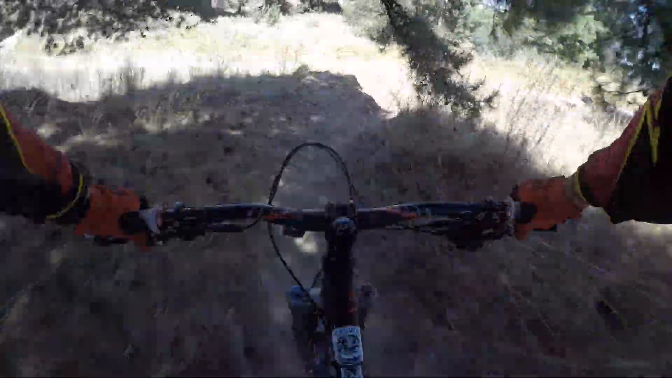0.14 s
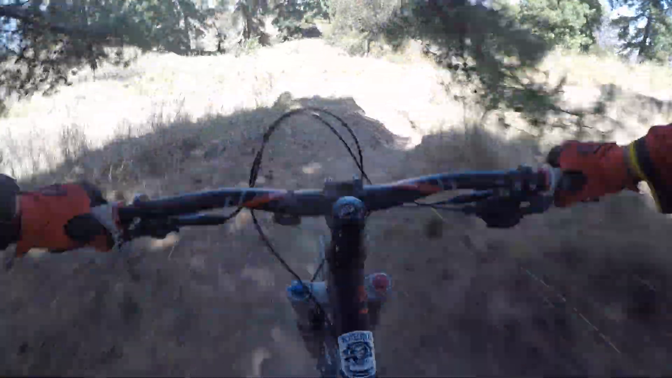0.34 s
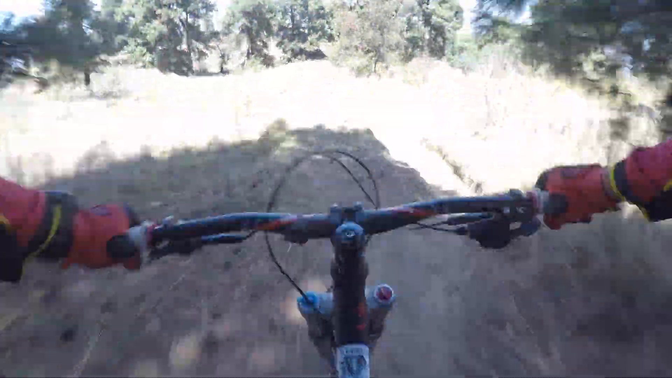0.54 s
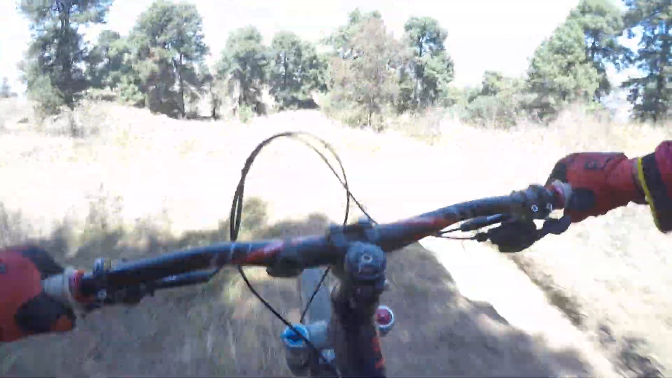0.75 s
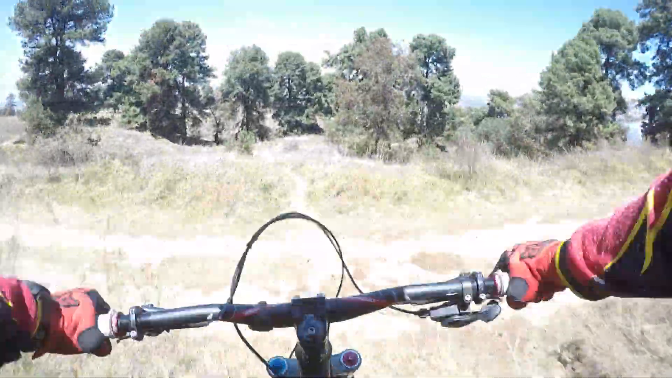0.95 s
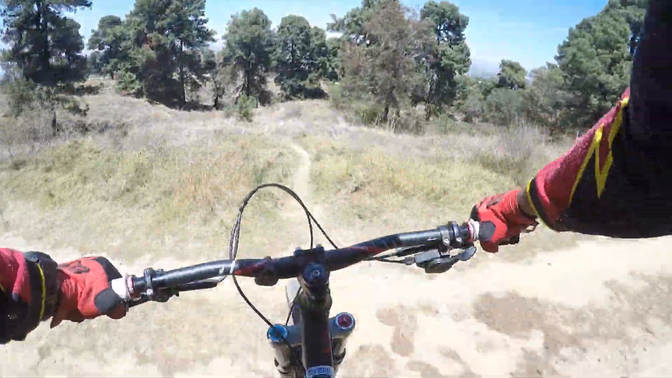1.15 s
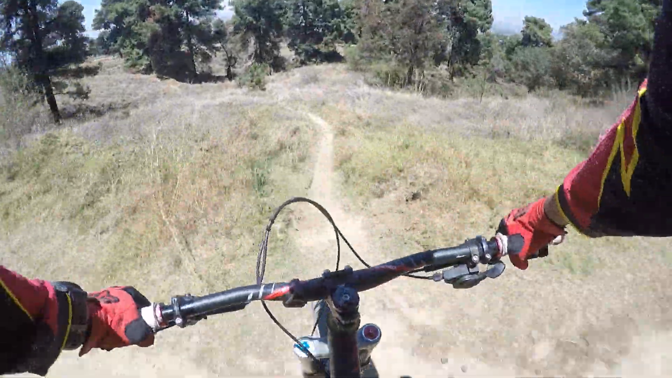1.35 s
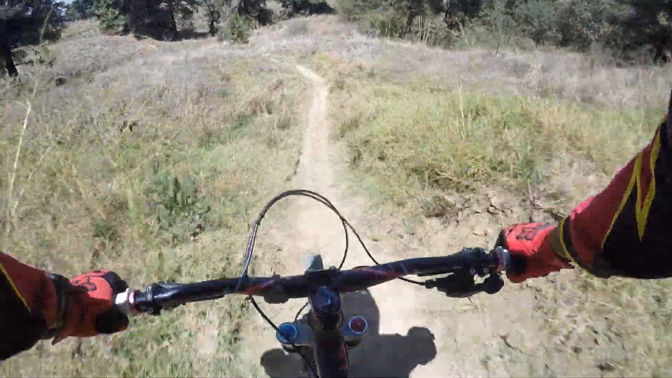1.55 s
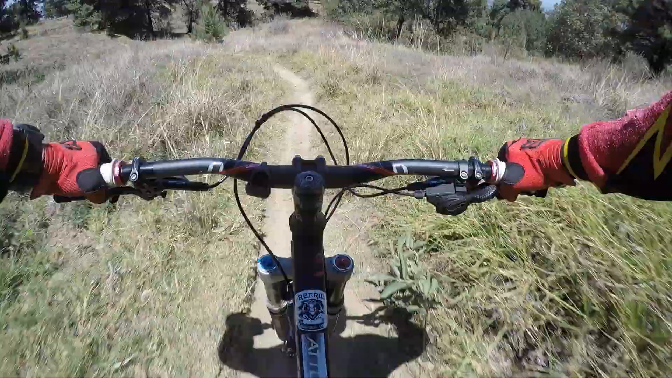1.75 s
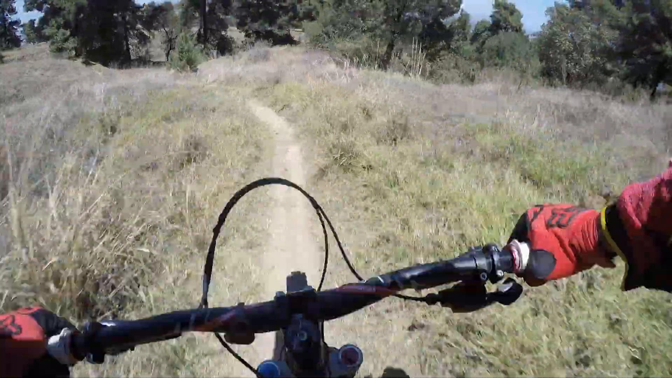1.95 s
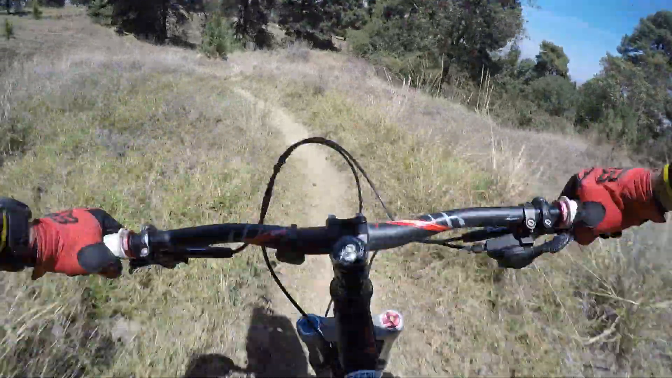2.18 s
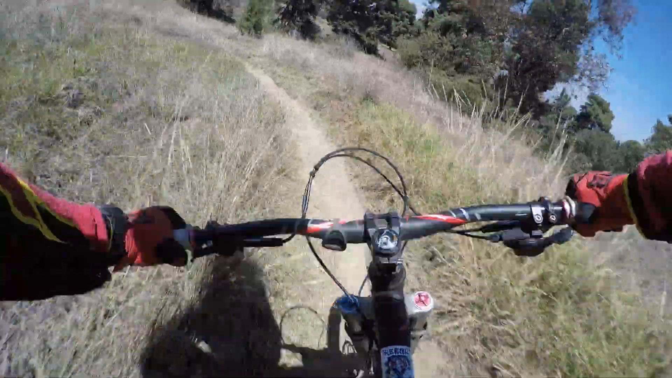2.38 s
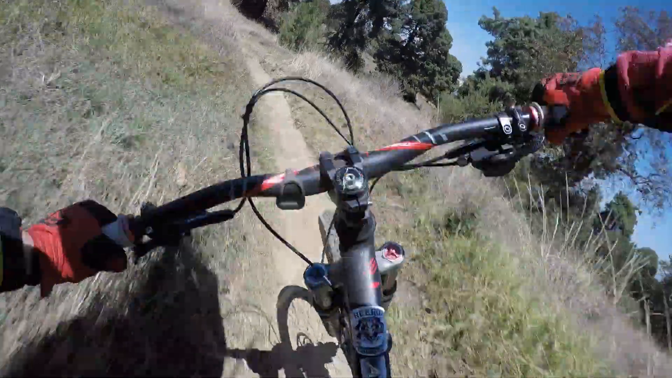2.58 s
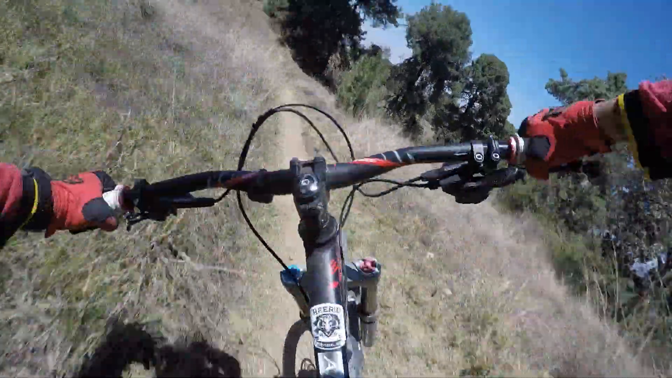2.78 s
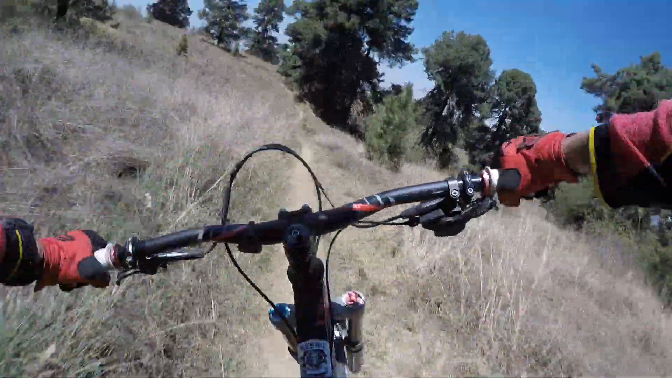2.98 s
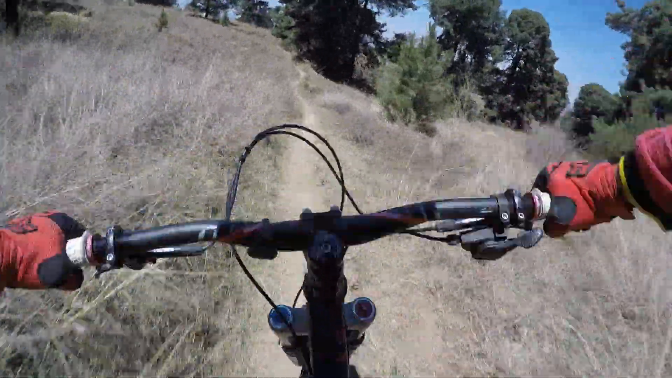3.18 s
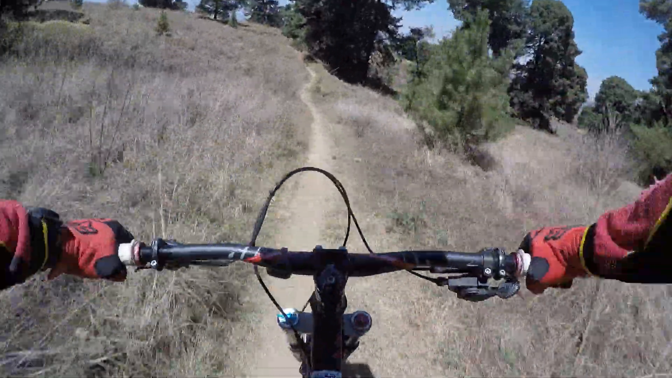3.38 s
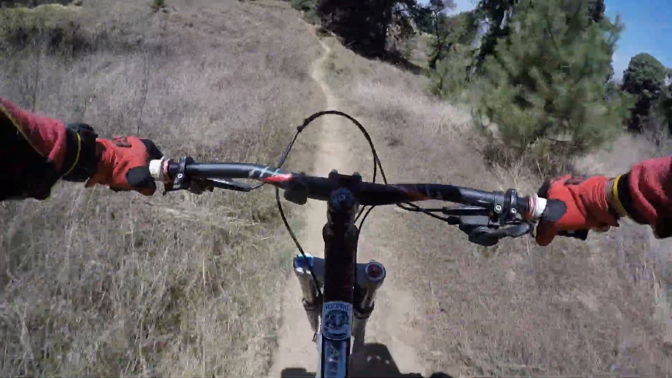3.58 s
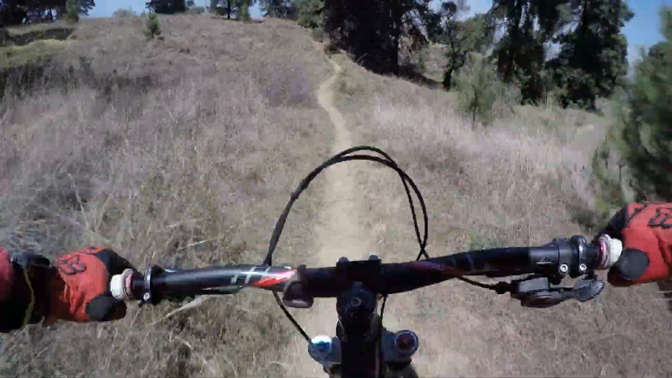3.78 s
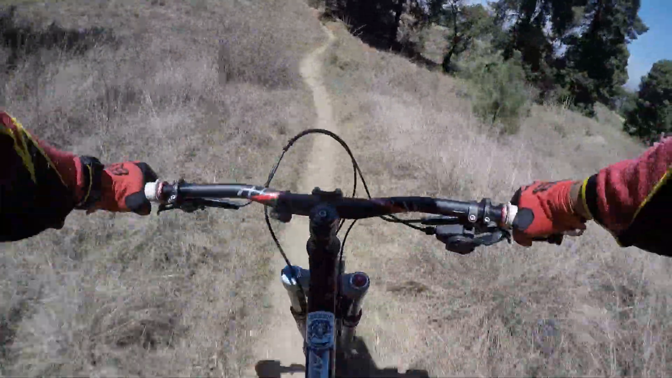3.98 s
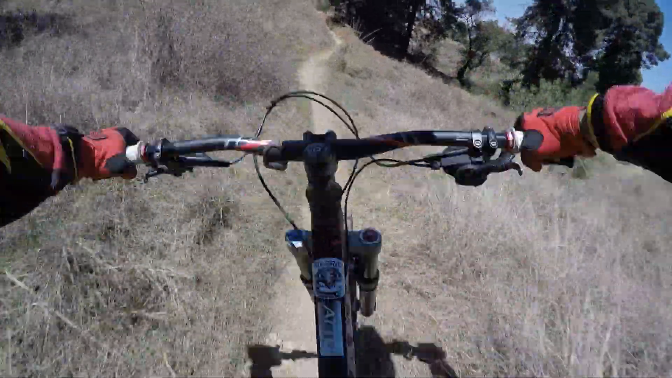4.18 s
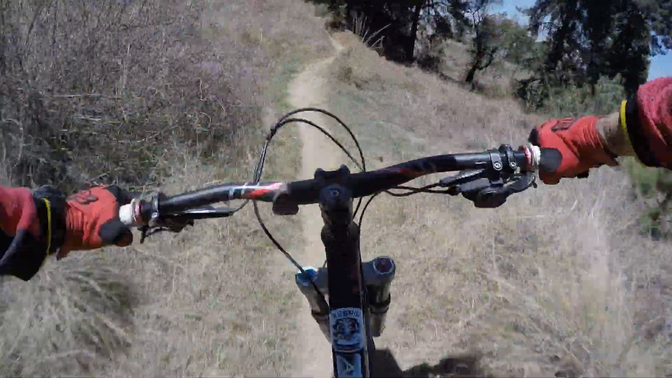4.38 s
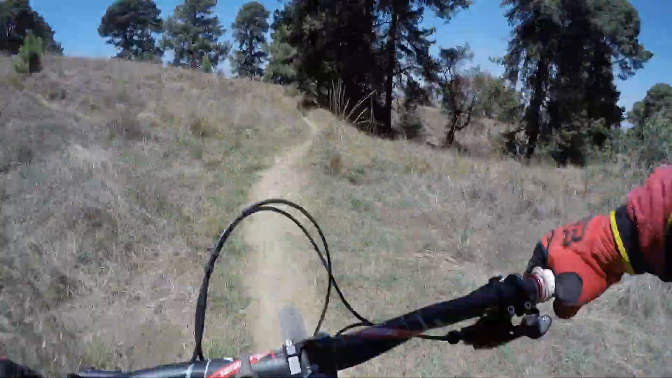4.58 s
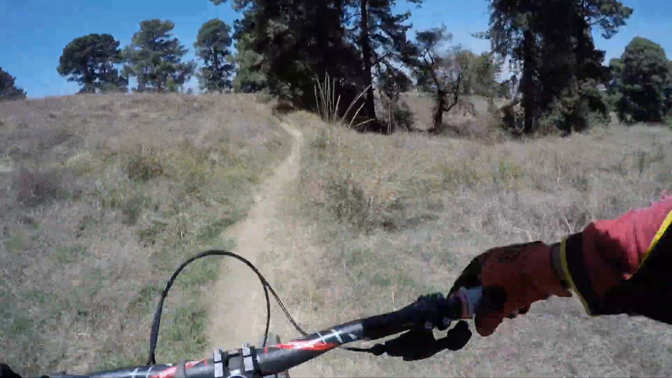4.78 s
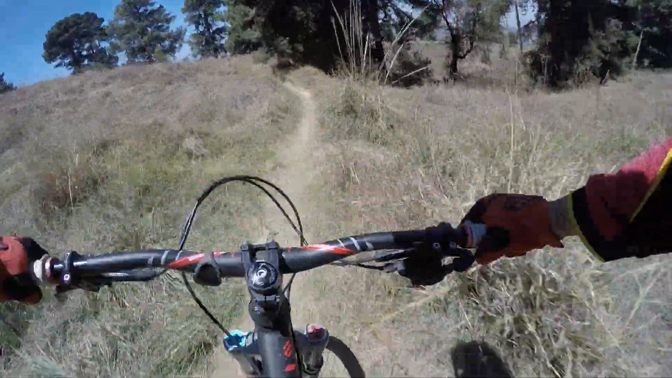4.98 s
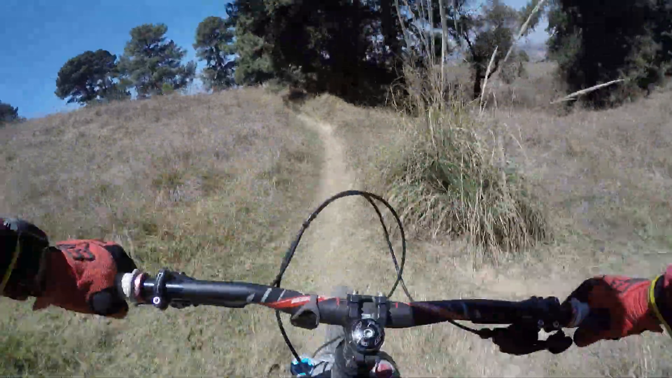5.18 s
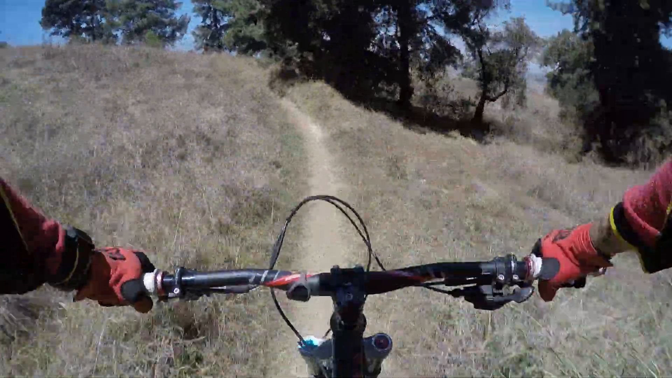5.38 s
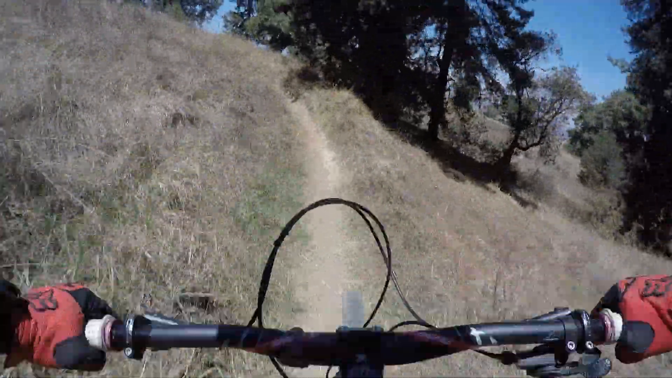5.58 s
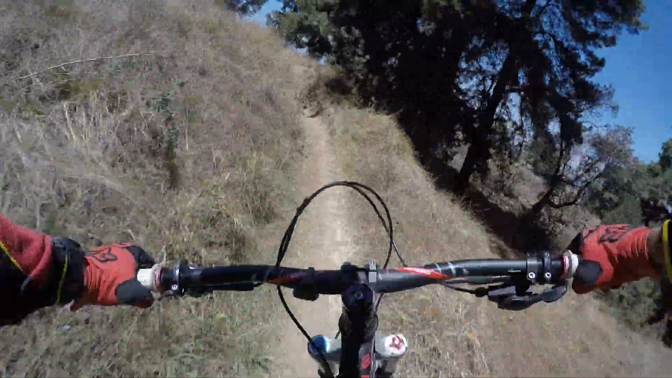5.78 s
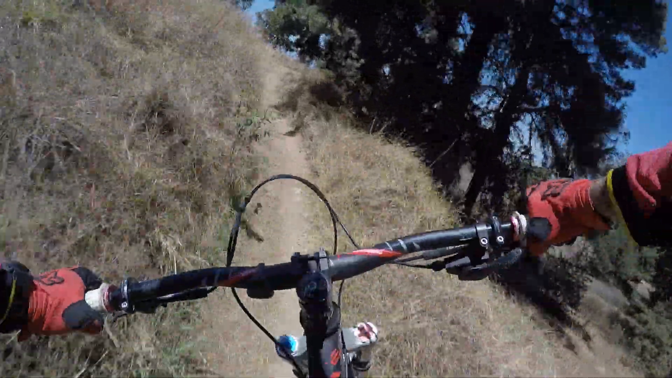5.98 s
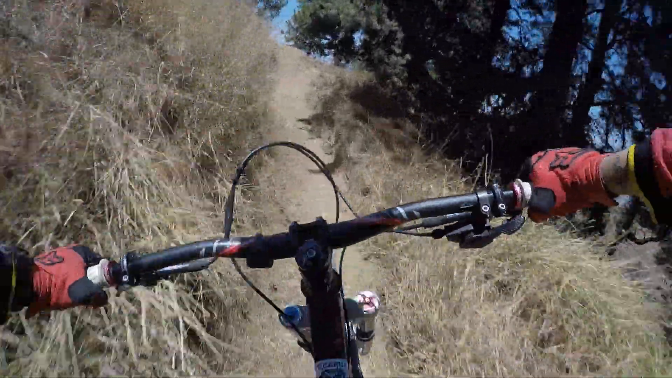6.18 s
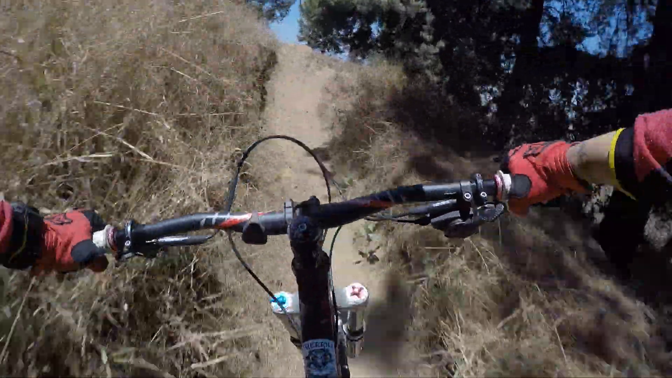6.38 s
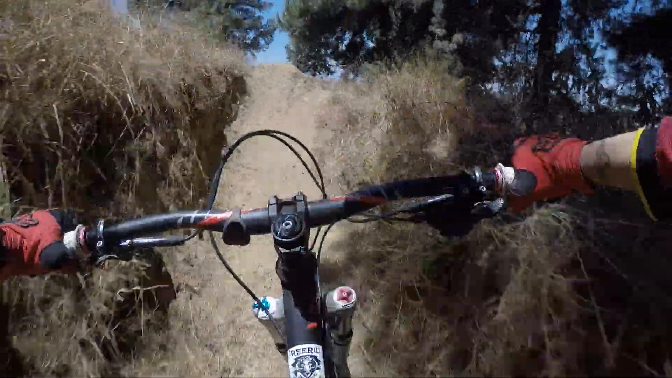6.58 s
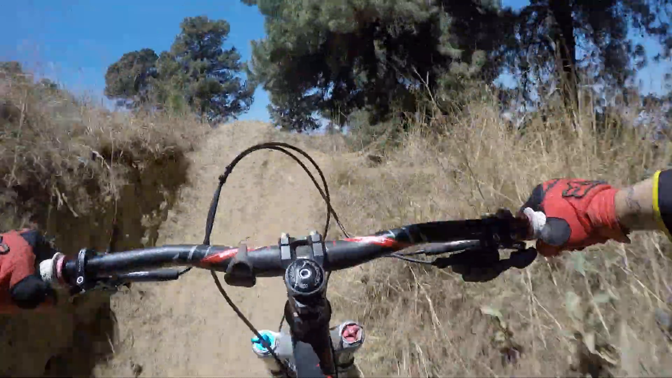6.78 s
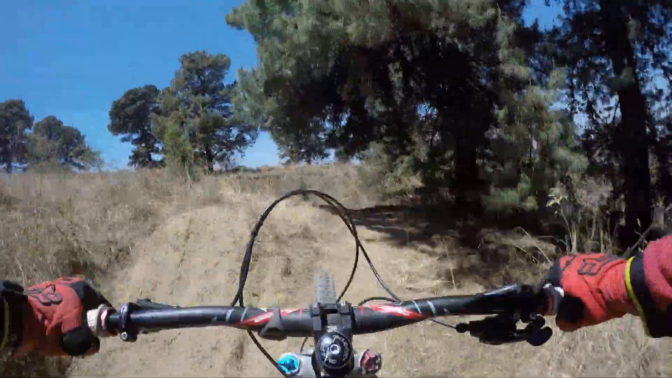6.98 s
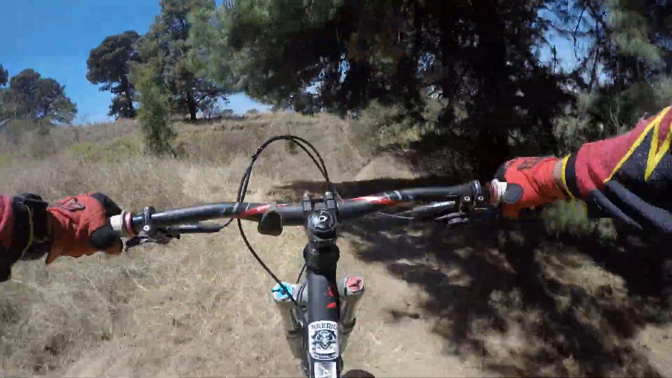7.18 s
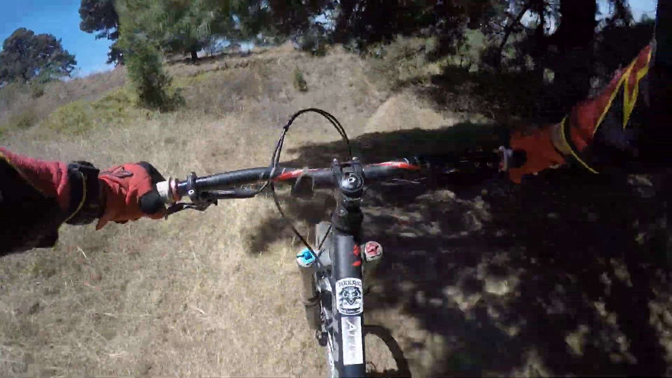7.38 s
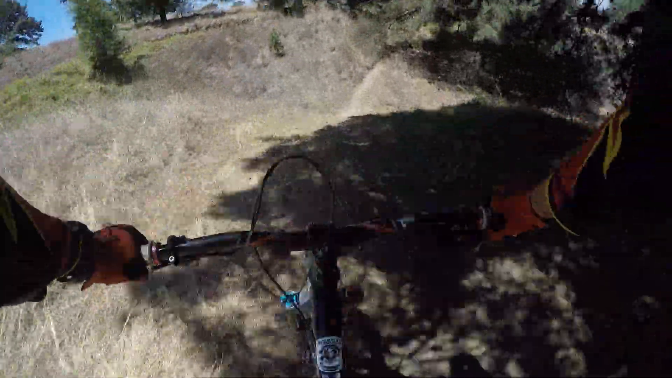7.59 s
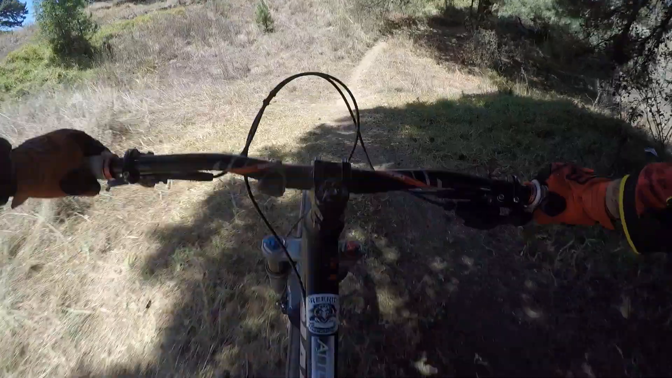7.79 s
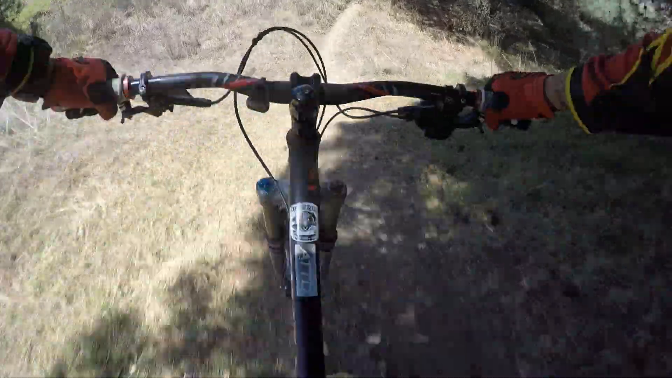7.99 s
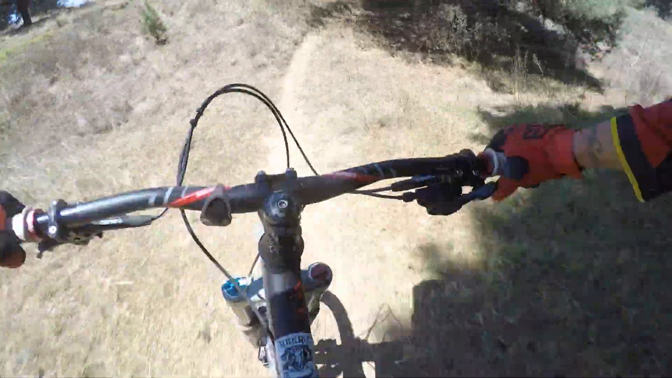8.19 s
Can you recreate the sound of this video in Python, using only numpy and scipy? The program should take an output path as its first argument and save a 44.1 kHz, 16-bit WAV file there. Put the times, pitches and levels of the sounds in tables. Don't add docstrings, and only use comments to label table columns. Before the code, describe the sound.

Close, boxed-in sound from a camera in a plastic case on a rider's chest outdoors. Grit hisses and low rumble swells, then irregular hard plastic clacks, mount knocks and deep pressure thumps pile up. Chain and cables jingle, densest around four seconds. Later the clacks thin out to softer bonks, crunching tyres and a dry pebble tick, before a few last thuds.

```python
import sys
import numpy as np
from scipy import signal
from scipy.fft import rfft, irfft
from scipy.io import wavfile
from scipy.ndimage import uniform_filter1d

SR = 44100
rng = np.random.default_rng(int(sys.argv[2]) if len(sys.argv) > 2 else 0)


def level_to_linear(level):
    exponent = np.asarray(level, float) / 20
    return 10 ** exponent


def transcribe(u):
    v = np.clip(np.atleast_2d(u).T, -1, 1)
    q = np.round(v * 32767).astype(np.int16)
    wavfile.write(sys.argv[1], SR, q)


N = 363825

# (time [s], clack level [dB], push level [dB], push length [ms])
CLACK_JOLTS = [(0.4546, -5, -3, 26), (0.5759, 1, -0.5, 26), (0.6611, 4, -5.5, 14), (0.772, 5, -5.5, 15),
               (1.7824, 9.5, -0.5, 14.12), (2.0901, 4.5, -2, 17.85), (2.385, -1.5, -3.5, 24),
               (2.673, -9.5, -5, 32), (2.7043, -3.5, -5.5, 16), (2.84, -9, -7, 14), (2.9142, 1, 0, 23),
               (3.3575, -3.5, -4, 21), (3.905, -9, -2, 54), (3.9365, 3.5, 1.5, 25),
               (4.3019, -5.5, -6.5, 21), (4.3574, 7, 1.5, 19.6), (4.5487, 4, -3.5, 18.11),
               (4.6767, 0.5, -3, 21), (5.0248, -6.5, -1.5, 34), (5.132, -2, -4.5, 19), (5.264, 4, 0.5, 23),
               (5.331, -2.5, -5.5, 27), (5.6734, -4.5, -3, 20), (5.753, -3, -5, 19),
               (5.816, -6.5, -11, 29.19), (6.2521, -3.5, -4.5, 25), (6.7333, -5, -5, 16),
               (6.9947, 0.5, -1, 19), (7.893, -4.5, -11, 16.5), (8.1678, -5, -1.5, 25)]
# (frequency [Hz], level [dB])
CRUNCH_SPECTRUM = [(450, -10.5), (760, -10), (1200, -1.5), (2750, -2), (3150, -10.5), (3900, -8.5),
                   (4400, -14), (6000, -31)]
# (frequency [Hz], level [dB])
JINGLE_SPECTRUM = [(3000, 0), (4300, -1), (6300, 6), (8500, -12.5), (11000, -28), (14500, -23),
                   (15500, -36)]


def unit(x):
    return x / np.sqrt(np.mean(x ** 2))


def colour(x, points):
    hz, db = np.transpose(points)
    f = np.maximum(np.fft.rfftfreq(len(x), 1 / SR), 1)
    octaves_outside = np.maximum(np.log2(hz[0] / f), 0) + np.maximum(np.log2(f / hz[-1]), 0)
    gain = unit(level_to_linear(np.interp(np.log(f), np.log(hz), db) - 7.7 * octaves_outside))
    return irfft(rfft(x) * gain, len(x))


def white():
    return rng.standard_normal(N)


def walk(rate_hz):
    hold = max(int(SR / rate_hz), 1)
    steps = np.repeat(rng.standard_normal(N // hold + 1), hold)
    return unit(uniform_filter1d(steps, hold)[:N])


def push(start_s, length_s, size):
    phase = np.clip((np.arange(size) / SR - start_s) / length_s, 0, 1)
    return np.sin(np.pi * phase) ** 2


def ring(modes, size=2600):
    t = np.arange(size) / SR
    return sum(g * np.exp(-np.log(1000) * t / t60) * np.sin(2 * np.pi * hz * t) for hz, t60, g in modes)


def add(out, s, sound):
    i = int(s * SR)
    out[i:i + len(sound)] += sound[:max(len(out) - i, 0)]


def grains(rate_hz, spread_db, tail_s):
    sizes = level_to_linear(spread_db * np.minimum(rng.exponential(size=N), 3.5))
    hits = (rng.random(N) < rate_hz / SR) * sizes
    return unit(signal.lfilter([1], [1, -np.exp(-1 / (tail_s * SR))], hits))


def resonate(x, parts, flicker_db):
    out = np.zeros(N)
    for hz, width_hz, db in parts:
        drive = level_to_linear(db + flicker_db * walk(40)) * x
        out += np.sqrt(SR / width_hz) * signal.lfilter(*signal.iirpeak(hz, hz / width_hz, SR), drive)
    return out


def trail(column, calm_db, rise_db_s, fall_db_s):
    # (start [s], length [s], crunch level [dB], shaking level [dB])
    patches = [(.01, 0.12, -54.5, -27.5), (1.349, 0.027, -60.5, -40), (3.514, 0.2077, -52.5, -42),
               (7.348, 0.0554, -57, -44), (7.59, 0.11, -52.5, -36), (0.27, 0.13, -43.5, -27.5),
               (0.516, 0.21, -41, -24), (0.902, 0.17, -50, -28.5), (1.66, 0.085, -35, -18.5),
               (1.947, 0.2, -47.5, -26.5), (2.439, 0.2, -43, -21), (2.724, 0.33, -41.5, -27.5),
               (3.15, 0.24, -44, -26.5), (3.73, 0.19, -38.5, -21.5), (4.048, 0.18, -50, -31.5),
               (4.218, 0.4066, -38, -22.5), (4.83, 0.1289, -48.5, -31), (5.066, 0.32, -42.5, -23.5),
               (5.493, 0.087, -48, -35), (5.614, 0.23, -43.5, -22.5), (5.984, 0.31, -42.5, -22),
               (6.373, 0.69, -45, -23.5), (7.15, 0.16, -51, -34), (7.743, 0.17, -43, -24.5),
               (8.152, .2, -43, -25.5)]
    t = np.arange(0, N, 64) / SR
    power = level_to_linear(calm_db) ** 2
    for patch in patches:
        start_s, length_s = patch[:2]
        before_s = np.maximum(start_s - t, 0)
        after_s = np.maximum(t - start_s - length_s, 0)
        power = power + level_to_linear(patch[column] - rise_db_s * before_s - fall_db_s * after_s) ** 2
    return np.interp(np.arange(N) / SR, t, 10 * np.log10(power))


def crunch_trail_db():
    return trail(column=2, calm_db=-58, rise_db_s=157, fall_db_s=77)


def ground():
    # (frequency [Hz], width [Hz], level [dB])
    pockets = [(1200, 220, -4.5), (1950, 2000, -21.5), (2743, 580, -0.5), (3893.2, 230, -5.5)]
    air_spectrum = [(200, -1), (3000, -15.5), (5000, -29), (11000, -34), (14000, -30.5)]  # (Hz, dB)
    grit = (0.75 + 0.35 * grains(400, 4, 0.0026)) * white()
    crunch = colour(grit + level_to_linear(-23) * resonate(grit, pockets, 4.7), CRUNCH_SPECTRUM)
    flicker_db = 1.3 * walk(30)
    air = colour(white(), air_spectrum)
    return level_to_linear(crunch_trail_db() - 5 + flicker_db) * crunch + level_to_linear(-60 + 1.9 * flicker_db) * air


def chest():
    # (start [s], push level [dB], length
    # [ms])
    bumps = [(0.258, -7, 31), (0.499, -6, 14.6), (0.606, -3, 21), (0.728, -2.5, 20.064), (1.017, -6, 43),
             (1.042, -4.5, 24.42), (1.715, 0, 31.57), (2.115, -7, 23), (2.431, -0.8, 21),
             (2.496, -9.5, 18.33), (2.588, -14, 27), (2.757, -3, 19.453), (2.862, -5, 18),
             (2.939, -5, 12.7), (3.029, -3, 31), (3.064, -5.5, 22), (3.152, -6, 17), (3.219, -4, 22.4),
             (3.718, -4.5, 27), (3.832, -1.5, 30), (4.382, -0.5, 23), (4.485, -5, 15), (4.7, -8.5, 39),
             (5.062, -1.5, 24), (5.29, -3, 22.48), (5.693, -3, 16.6), (5.774, -1.5, 21.07),
             (6.768, -7, 15.3), (7.827, -12, 29), (8.198, -7, 24.6)]
    # (start [s], push level [dB])
    heaves = [(7.012, -9), (7.769, -13), (2.985, -10.5), (1.5, -7), (0.61, -11), (6.491, -5.5), (5.4, -4),
              (6.648, -4.5), (4.8, -10), (7.9, -9), (0.86, -7), (1.581, -10), (2.3, -14), (1.4, -4),
              (2.9, -10.5), (3.965, -2.5), (4.2, -15), (4.6, -16), (9.4, -4), (6.141, -11), (3.8, -18.5),
              (5.937, -19), (5.993, -20), (6.183, -15), (5.4, -10), (7.9, -18), (8.2, -10.5), (14, -10),
              (3.3, -11), (3.3, -10.5), (5.358, -15), (3.6, -11), (2.4, -12), (7.915, -16), (0.61, -4)]
    # (time [s], thud level [dB], push level [dB])
    landings = [(1.355, -64, -20.5), (6.362, -33, -21), (6.446, -37, -15), (7.36, -41, -21),
                (2.12, -28, -37), (5.492, -32, -46), (6.098, -36, -40), (0.271, -22, -40),
                (0.368, -39, -5.5), (1.63, -39, -1), (1.953, -32, -6), (2.356, -26.5, -4),
                (3.196, -40, -47), (4.234, -33, 1), (4.313, -22.5, -38.5), (4.979, -25, -5),
                (7.732, -19.5, 0.5), (8.148, -23, -4)]
    # (frequency [Hz], level [dB])
    rumble_spectrum = [(10, -6), (22, 8), (40, -4), (60, -15), (110, -27.5), (170, -38)]
    # (frequency [Hz], level [dB])
    drone_spectrum = [(70, 6.5), (130, -0.5), (250, -9), (450, -20.5), (700, -26.5)]
    heave_ms, landing_ms = 29, 16.397
    sharp_push_ms, lead_share = 13.3, 0.23
    thud_hz, thud_t60_s, thud_lead_s = 150, 0.04, 0.0042

    pushes = bumps + [(s, db, heave_ms) for s, db in heaves]
    pushes += [(s, db, landing_ms) for s, _, db in landings]
    pushes += [(s - lead_share * (ms - sharp_push_ms) / 1000, db, ms) for s, _, db, ms in CLACK_JOLTS]
    force, thuds = np.zeros(N), np.zeros(N)
    for s, db, ms in pushes:
        add(force, s, level_to_linear(db) * push(0, ms / 1000, size=2200))
    thud = np.convolve(ring([(thud_hz, thud_t60_s, 1)]), np.hanning(90) / 45)
    for s, db, _ in landings:
        add(thuds, s - thud_lead_s, level_to_linear(db + 8.5) * thud)
    air_leak = signal.butter(2, 15, "high", fs=SR, output="sos")
    jolts = signal.sosfilt(air_leak, force)

    shaking_db = trail(column=3, calm_db=-47, rise_db_s=200, fall_db_s=97.5) + walk(12)
    shake = level_to_linear(shaking_db + 4) * colour(white(), rumble_spectrum)
    swell = 0.4475 + 5.561 * uniform_filter1d(force, size=600)
    swell += 0.34 * uniform_filter1d(np.abs(shake), size=900) / level_to_linear(shaking_db)
    drone = level_to_linear(0.67 * shaking_db - 25) * swell * colour(white(), drone_spectrum)
    return jolts + thuds + shake + drone


def jingles():
    # (time [s], peak level [dB], length [ms])
    slaps = [(0.5929, -37, 7.83), (0.608, -37, 15), (0.915, -33.5, 5.673), (1.6544, -40, 25),
             (1.6787, -40, 13), (1.7929, -27, 4.4), (2.7223, -30.5, 8.6), (2.7769, -36, 17.02),
             (2.7944, -31.5, 7.32), (2.834, -31.5, 6.87), (2.856, -31.5, 14.21), (3.204, -35.5, 11.4),
             (3.782, -26, 13.5), (3.8153, -27.5, 12), (3.8367, -28.5, 13), (3.8825, -31.5, 8.21),
             (3.9444, -36, 12), (4.217, -25, 8.523), (4.238, -28, 6.265), (4.2806, -27, 7.9),
             (4.311, -27.5, 9), (4.419, -32, 9.9), (4.494, -29, 7), (4.524, -33.5, 32), (4.6028, -33, 7.9),
             (4.665, -34, 8.3), (5.063, -35.5, 8.9), (5.6565, -35, 6.865), (6.2071, -38, 30),
             (7.767, -33, 7.3)]
    # (time [s], peak level [dB], length [ms], dull part level [dB])
    scuffs = [
        (0.12, -40.5, 6.7, -15.5),
        (0.214, -35.5, 7.644, -12),
        (1.025, -55.5, 50.4, 16.5),
        (1.1495, -46.5, 11, 1),
        (1.763, -34, 7.1, 3),
        (5.889, -39.5, 7.006, 5),
        (7.093, -58, 58, 17.5),
        (7.16, -41.5, 6.38, 8),
        (7.2, -29.5, 8.34, -5),
    ]
    # (time [s], peak level [dB])
    faint_ticks = [(.3345, -42.5), (1.6891, -37), (1.713, -35), (1.8371, -38.5), (1.884, -39),
                   (1.9194, -38), (1.9385, -39), (2.0423, -37), (2.062, -40), (2.5516, -36), (2.5895, -43),
                   (2.7645, -37), (3.8594, -29), (4.0056, -34.5), (4.4033, -43), (4.4552, -35),
                   (4.762, -37.5), (6.192, -31), (7.9368, -42), (1.815, -42), (1.963, -46.5), (2.025, -41),
                   (2.184, -54), (2.371, -46), (5.7324, -54), (0.225, -46), (.236, -44), (.25, -41),
                   (0.364, -46), (5.576, -49), (5.613, -46), (5.628, -48), (5.676, -32), (5.784, -52),
                   (5.982, -51), (6.118, -53), (6.141, -47), (2.27, -57), (4.546, -23)]
    # (frequency [Hz], width [Hz], level [dB])
    chain_parts = [(4430, 380, 0), (4750, 160, 4.5), (5800, 170, -8), (7200, 220, 2), (8100, 440, 6),
                   (9900, 2100, 5.5), (12700, 270, -12.5)]
    tick_ms, attack_s = 7.182, 0.0013724

    bright, dull = np.zeros(N), np.zeros(N)
    t = np.arange(2500) / SR
    for s, db, ms, *dull_db in slaps + scuffs + [(s, db, tick_ms) for s, db in faint_ticks]:
        decay = np.exp(-(t / (max(ms, 1) / 1000)) ** 2)
        gate = level_to_linear(db) * (1 - np.exp(-t / attack_s)) * decay
        add(bright, s - .001, gate)
        add(dull, s - .001, level_to_linear(sum(dull_db)) * gate)
    noise = (0.73 + 0.27 * grains(830, 1.3, 0.002)) * white()
    fine = level_to_linear(-21.5 + 0.95 * crunch_trail_db())
    ticks = (level_to_linear(-11) * bright + fine * (0.68 + 0.42 * grains(90, 2.2, 0.0023))) * noise
    grit = fine * (0.39 + 0.5 * grains(60, 2.1, 0.0022)) * white()
    rings = resonate(ticks, chain_parts, 3.5)
    thin = colour(level_to_linear(4 * walk(32)) * ticks, [(9000, -12), (12800, -2), (14500, -3.5)])
    metal = colour(ticks, JINGLE_SPECTRUM) + level_to_linear(-21) * rings + level_to_linear(-20) * thin
    hiss = level_to_linear(-8.5) * colour(grit, JINGLE_SPECTRUM[3:])
    return metal + hiss + level_to_linear(-4.5) * colour(dull * noise, CRUNCH_SPECTRUM)


def scrapes():
    # (time [s], peak level [dB], length [ms], frequency [Hz])
    rasps = [(1.594, -43, 6, 2280), (1.598, -39, 10, 1159), (1.682, -34, 18, 2300),
             (2.51, -37.5, 15.34, 2750), (2.588, -32, 8, 2657), (3.783, -36, 13, 2723),
             (3.788, -31.5, 13, 1250), (3.806, -30.5, 14, 2800), (3.815, -27, 21.52, 1240),
             (3.856, -34, 8, 2780), (4.283, -22, 10.57, 1500), (4.283, -27.5, 8.6, 2450),
             (4.405, -32.5, 51, 1250), (4.457, -26, 7, 2550), (4.512, -31, 26, 1310),
             (4.515, -34, 20, 2684), (4.663, -32, 9.3, 2707), (7.09, -47, 17.7, 3992),
             (7.09, -45.5, 17.57, 3400), (7.099, -32, 12.52, 2800), (7.104, -42, 10, 2200),
             (7.834, -40.5, 7.87, 4400), (7.767, -37.5, 6.1, 10000), (7.82, -41, 6.49, 7000),
             (7.905, -49, 8, 8000), (7.994, -50, 10, 6500), (8.174, -50.5, 4.61, 9500),
             (8.188, -41, 10, 6140), (8.192, -47, 8, 8800), (8.218, -51, 10, 8467), (8.226, -43, 8, 4500)]
    # (time [s], peak level [dB], frequency [Hz])
    links = [(.607, -40, 9900), (2.351, -36, 2400), (2.795, -37, 4500), (2.859, -30, 5881),
             (3.045, -31, 1870), (3.28, -31.5, 2430), (3.764, -37, 1320), (3.801, -38, 4630),
             (3.872, -34, 4520), (4.236, -41, 7400), (4.404, -36, 4740), (4.499, -26, 1320),
             (4.647, -37, 3640), (5.151, -28, 2430), (5.356, -36, 2750), (5.677, -41, 7400),
             (6.056, -33, 2400), (6.057, -35, 1320), (6.558, -33, 1210), (6.907, -31.5, 1213),
             (.064, -45, 3200), (.392, -53, 6000), (1.864, -41, 4500), (2.589, -42, 4700),
             (2.587, -43, 8272), (2.318, -39, 2193), (2.276, -44.5, 1400)]
    link_ms, width_share, attack_s = 7.5, 0.06, 0.0018
    out, t = np.zeros(N), np.arange(2500) / SR
    for s, db, ms, hz in rasps + [(s, db, link_ms, hz) for s, db, hz in links]:
        noise = rng.standard_normal(len(t))
        rasp = unit(signal.lfilter(*signal.iirpeak(hz, 1 / width_share, SR), noise))
        gate = (1 - np.exp(-t / attack_s)) * np.exp(-(t / (max(ms, 1) / 1000)) ** 2.629)
        add(out, s - .001, level_to_linear(db - 3) * rasp * gate)
    return out


def clacks():
    # (frequency [Hz], t60 [s], signed strength at the microphone)
    case_modes = [(287.5, 0.02657, -0.46), (473, 0.011292, 0.3581), (1120, 0.027, 0.12),
                  (1264, 0.0084, 0.9), (1536, 0.013, -0.66), (1747.1, 0.031, 0.2), (2098, 0.0076, -0.97),
                  (2388, 0.018, 0.87), (2686.6, 0.014, 0.83), (3060, 0.012, -0.79), (3453, 0.014, -0.46),
                  (3706, 0.015, 0.93), (4182.9, 0.012, -0.9), (4800, 0.019, -0.41)]
    # (time [s], clack level [dB])
    taps = [(3.021, -20.5), (0.313, -15), (0.7064, -2.5), (0.9776, -4.5), (1.907, -5), (2.016, -7),
            (2.1361, -8.5), (2.9644, -1), (3.1964, -14.5), (4.4677, -1.5), (4.7425, -8), (6.495, -13),
            (7.0316, -4.5), (7.755, -11)]
    # (frequency [Hz], t60 [s], strength)
    lens_modes = [(6338.3, 0.01, 0.61), (8280, 0.0096, -0.17)]
    # (frequency [Hz], t60 [s], strength)
    frame_modes = [(1814, .45, .0034), (2320, .08, .011), (1210, .08, .003)]
    loose_spectrum = [(500, -15), (750, 2.5), (1500, -9), (2300, 2.5), (3500, -8.5), (5500, -36)]  # (Hz, dB)

    out, crack, blows, rattle = np.zeros((4, N))
    t = np.arange(1500) / SR
    crack_decay = np.exp(-t / 0.001714) + level_to_linear(-31.5) * np.exp(-t / 0.0071)
    rattle_decay = np.exp(-t / 0.007892)
    for s, db in [row[:2] for row in CLACK_JOLTS] + taps:
        vary = rng.standard_normal(len(case_modes))
        force = push(s * SR % 1 / SR, 0.00039 * level_to_linear(-0.15 * db), size=64)
        modes = [(hz * (1 + 0.014 * v), t60, g * level_to_linear(v + 0.14 * db * np.log2(hz / 1500)))
                 for (hz, t60, g), v in zip(case_modes, vary)]
        add(out, s, level_to_linear(db - 3) * np.convolve(ring(modes, size=1400), force / force.sum()))
        add(crack, s + 0.00044, level_to_linear(2.46 * db) * crack_decay)
        add(rattle, s + 0.0014, level_to_linear(1.44 * db) * rattle_decay)
        lens = ring([(hz * (1 + 0.017 * vary[1]), t60, g) for hz, t60, g in lens_modes])
        add(out, s + 0.0004, level_to_linear(1.9 * db - 32.5 + 9 * vary[0]) * lens)
        blows[int(s * SR)] = level_to_linear(0.91 * db + 3)
    tubes = level_to_linear(2 * walk(60)) * signal.fftconvolve(blows, ring(frame_modes, size=12000))[:N]
    loose = level_to_linear(-27.5) * rattle * colour(white(), loose_spectrum)
    return out + tubes + loose + level_to_linear(-33) * crack * colour(white(), JINGLE_SPECTRUM)


def knocks():
    # (time [s], peak level [dB], ring [Hz], sharp part level [dB])
    hits = [(0.639, -22.5, 1020, -23), (0.733, -16.5, 1080, -19), (0.912, -17.5, 1840, -7.5),
            (1.036, -24.5, 778.1, -14), (1.274, -33, 1868, -10), (1.631, -17, 1120, -19),
            (1.722, -14, 840, -12), (1.727, -14, 1890, -9), (1.981, -16.5, 834, -8.5),
            (2.449, -13, 1085, -22), (2.466, -9, 820, -8.5), (2.57, -15, 832.4, -8.5),
            (2.869, -19, 1090, -25.5), (2.892, -17, 820, -7.5), (3.033, -19, 387, -14.5),
            (3.262, -29.5, 990, -26), (3.732, -14, 1120, -14.5), (3.844, -14.5, 1010, -15),
            (3.874, -16.5, 760, -11), (4.111, -30.5, 1035, -20.5), (4.214, -26.5, 1000, -12),
            (4.243, -15.5, 1860, -12), (4.247, -16, 730, -28), (4.313, -16.5, 1120, -19),
            (4.397, -21.5, 765, -30), (4.573, -17, 1040, -19), (4.975, -30, 1859, 2.5),
            (6.652, -32, 1100, -14), (7.137, -32.5, 1005, -24), (7.727, -26, 1030, -14.5),
            (6.543, -39, 1010, -10.5), (6.701, -29.5, 824.3, -18.5), (6.878, -38, 1000, -21),
            (7.793, -34, 1005, -21), (8.2, -33, 1000, -23), (1.125, -42.5, 1000, -11.5),
            (0.518, -31, 880, -23)]
    # (multiple of ring frequency [1], t60 [s], strength)
    buckle = [(.84, 0.0093, 1), (1.15, 0.0069, -1.15), (.45, 0.0087, 0.0874)]
    mount = [(0.775, 0.028, 0.36), (1.028, 0.02, -0.73), (0.42464, 0.014, 0.34)]
    clip = [(0.96, 0.025, 0.69), (1.1, 0.013, -0.82), (0.53926, 0.014, 0.37), (0.272, .014, 0.11)]
    # (frequency [Hz], t60 [s], strength)
    buckle_sharp = [(1950, 0.011, -0.4772), (2400, 0.012, 0.72), (2847, 0.01361, -1.1),
                    (3484, 0.0107, -0.3556)]
    mount_sharp = [(1690, 0.031, 0), (2040, 0.011244, 3), (2600, 0.01153, -1.5), (2803.7, 0.011, 1.3)]
    clip_sharp = [(2400, 0.017, -0.67), (2800, 0.014, 0.8)]
    buckle_under_hz, mount_under_hz = 900, 1500

    out = np.zeros(N)
    for s, db, hz, sharp_db in hits:
        vary = rng.standard_normal(5)
        if hz < buckle_under_hz:
            own, sharp = buckle, buckle_sharp
        elif hz < mount_under_hz:
            own, sharp = mount, mount_sharp
        else:
            own, sharp = clip, clip_sharp
        modes = [(k * hz, t60, g) for k, t60, g in own]
        if hz < mount_under_hz:
            modes.append((290, 0.048, level_to_linear(-22 - 0.24 * db)))
        modes += [(f * (1 + 0.015 * v), t60, level_to_linear(sharp_db + 3) * g) for (f, t60, g), v in zip(sharp, vary)]
        first = push(s * SR % 1 / SR, 0.00035, size=300)
        bounce_s = 0.00459 + 0.00105 * np.clip(vary[-1], -2, 2)
        force = first + 0.21 * push(bounce_s, 0.00046, size=300)
        add(out, s - .0005, level_to_linear(db + 7) * np.convolve(ring(modes, size=1400), force) / first.sum())
    return out


def bonks():
    # (time [s], peak level [dB], frequency [Hz])
    blows = [(0.914, -34, 186), (.915, -30, 280), (.945, -29, 177.7), (1.034, -31, 160), (1.081, -29, 108),
             (4.652, -41.5, 220), (4.715, -41, 160), (4.811, -42, 168.4), (5.086, -33, 270),
             (5.151, -32, 169), (5.24, -30, 189.5), (5.296, -41, 200), (5.618, -32.5, 162.2),
             (5.975, -44, 305), (6.058, -35.5, 200.8), (6.152, -30.5, 187), (6.196, -34, 198.8),
             (6.292, -36, 130.9), (6.303, -29, 282.1), (6.355, -38, 290), (6.508, -28, 142),
             (6.559, -29, 260), (6.652, -24.5, 290), (6.775, -36, 150), (6.904, -39, 370),
             (7.067, -38, 170), (7.138, -42, 180), (7.842, -29.5, 150), (3.151, -41, 150),
             (3.875, -28, 130)]
    t60_cycles = 9.2
    out = np.zeros(N)
    for s, db, hz in blows:
        bonk = np.convolve(ring([(hz, t60_cycles / hz, 1)]), np.hanning(100) / 50)
        add(out, s, level_to_linear(db + 7) * bonk)
    return out


def pebble():
    # (frequency [Hz], t60 [s], strength)
    pebble_modes = [(7300, 0.0063, 1), (2550, 0.012, 0.45), (4847, 0.0047, -0.44), (10825, 0.0038, -.4),
                    (13200, 0.012, 0.151)]
    out = np.zeros(N)
    add(out, 7.3872, level_to_linear(-24) * ring(pebble_modes))
    return out


def scene():
    rolling = ground() + chest() + jingles() + scrapes()
    return (rolling + clacks() + knocks() + bonks() + pebble())[None]


def roll_off(x):
    return signal.sosfilt(signal.butter(12, 16370, fs=SR, output="sos"), x)


def record(dry):
    rounded = dry / (1 + np.abs(dry) ** 4) ** (1 / 4)
    low_pass = signal.cheby1(10, 0.5, 15000, fs=SR, output="sos")
    mix = np.clip(1.033 * signal.sosfilt(low_pass, rounded), -1, 1)
    return roll_off(mix)


dry = scene()
out = record(dry)
transcribe(out)
```